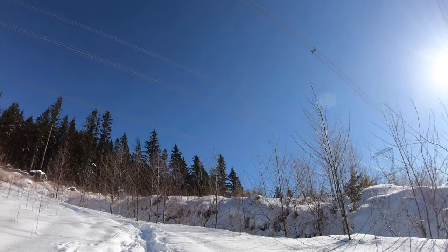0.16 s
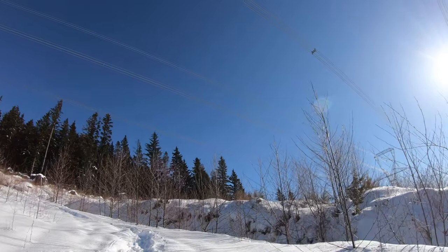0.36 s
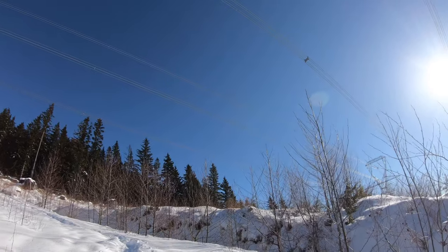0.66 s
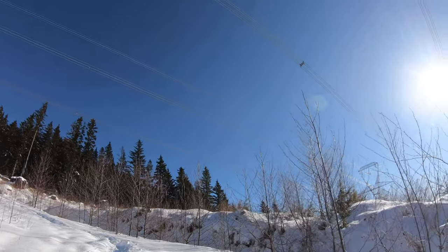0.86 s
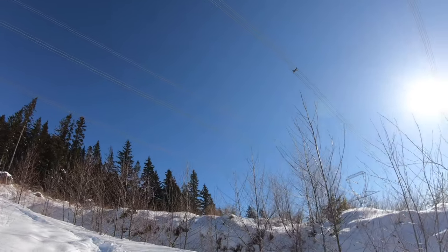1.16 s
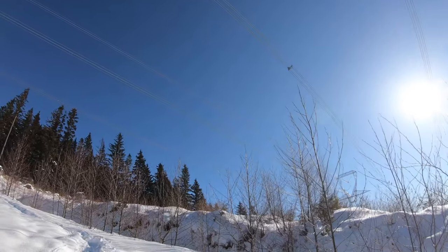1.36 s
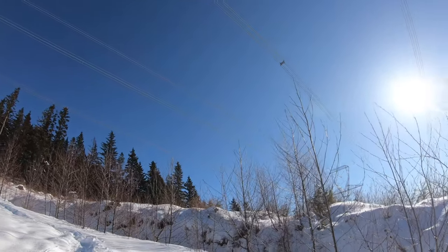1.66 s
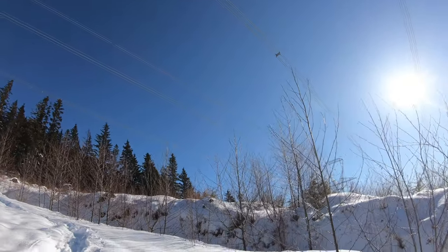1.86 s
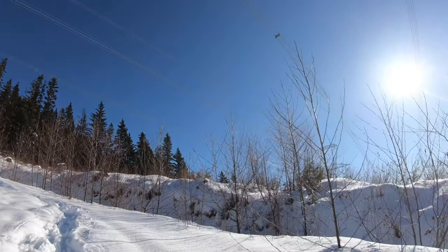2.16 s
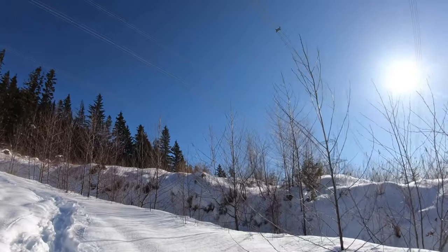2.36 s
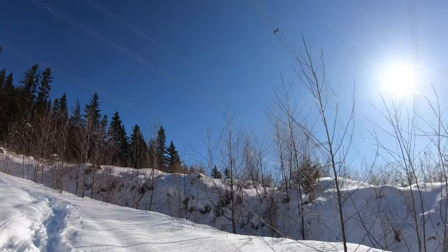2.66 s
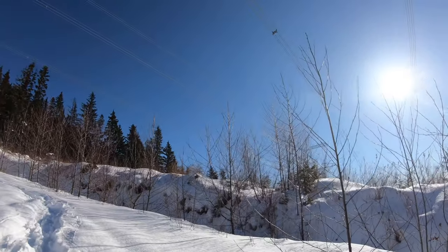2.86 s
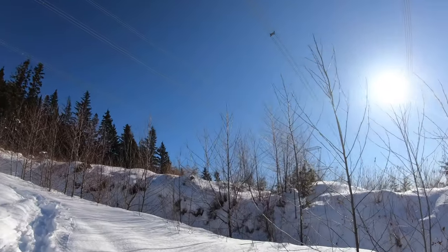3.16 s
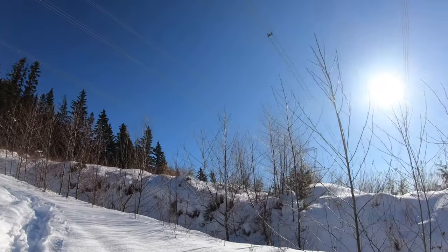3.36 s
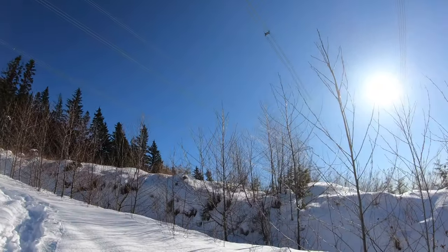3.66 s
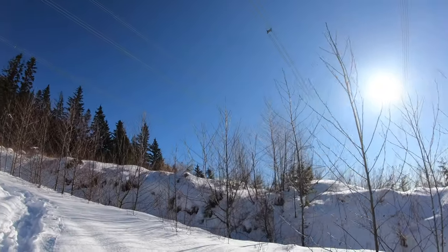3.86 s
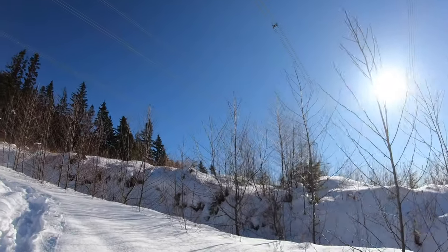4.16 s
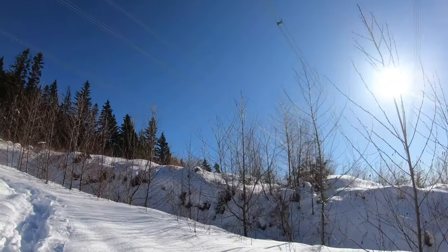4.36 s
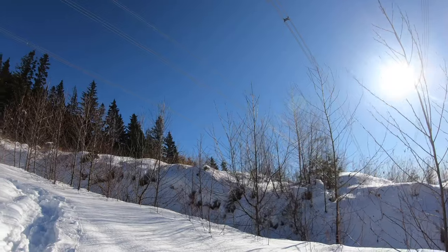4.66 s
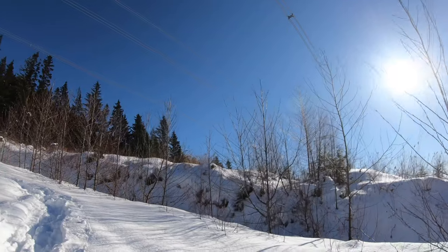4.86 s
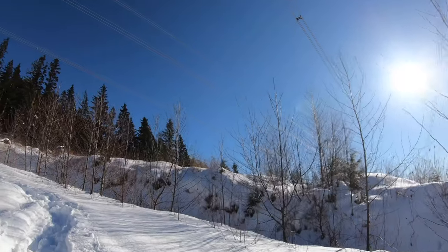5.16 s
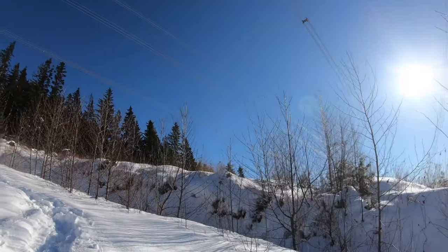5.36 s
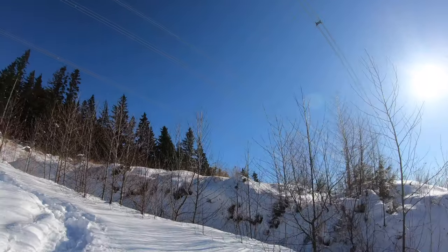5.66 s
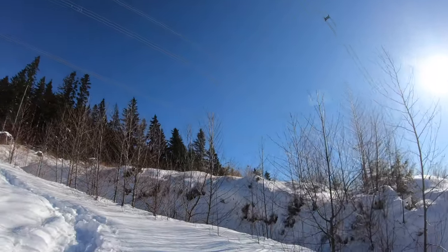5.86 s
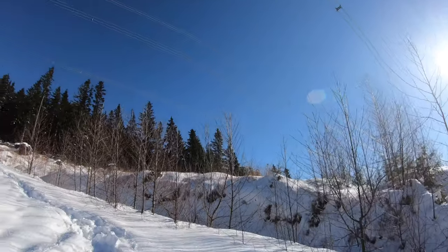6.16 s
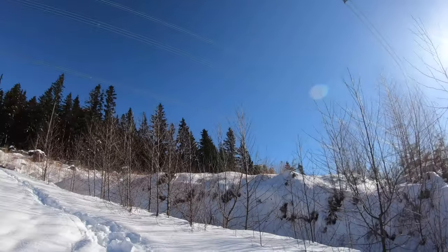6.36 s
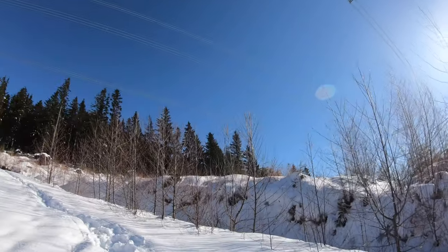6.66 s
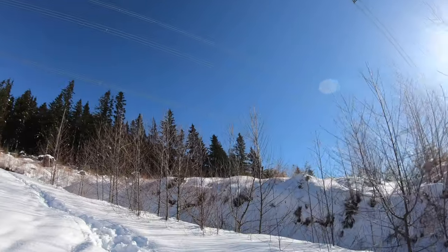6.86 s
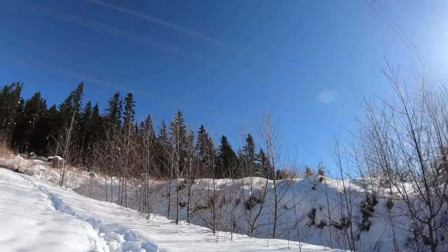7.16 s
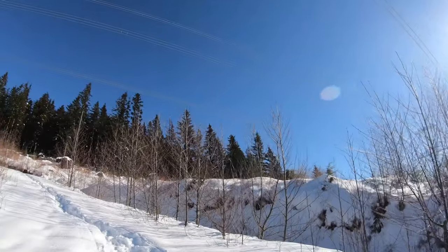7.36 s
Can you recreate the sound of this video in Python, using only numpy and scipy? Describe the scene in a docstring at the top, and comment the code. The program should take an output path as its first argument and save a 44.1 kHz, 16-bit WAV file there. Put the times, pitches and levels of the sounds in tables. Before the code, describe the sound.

Boots crunch at a walking pace through packed snow, with crust cracks, brief squeaks, faint cloth rustle and light wind buffeting the microphone.

```python
"""Footsteps on packed snow

Someone walks over packed snow on a quiet winter trail. Each boot sinks in one long crunch: a swarm of
breaking grains that follows its pressure, among short crunches, sharp cracks of crust and stick-slip squeaks.
Filtered noise and grains make the faint rustle of clothing; low noise and one-cycle puffs make the air
buffeting the microphone. The sound starts mono and opens to full stereo width between 2.8 and 5.8 s."""
import sys
import numpy as np
from scipy import signal
from scipy.fft import rfft, irfft
from scipy.io import wavfile
from scipy.ndimage import map_coordinates

SR = 44100
rng = np.random.default_rng(int(sys.argv[2]) if len(sys.argv) > 2 else 0)


def unload_wav(signal):
    """Save mono or channel-first audio to the path in sys.argv[1] as 16-bit WAV at rate SR, clipped to [-1, 1]."""
    wavfile.write(
        sys.argv[1],
        SR,
        np.round(np.clip(np.atleast_2d(signal).T, -1, 1) * 32767).astype(np.int16),
    )


N = 331796
TIME = np.arange(N) / SR

# relative spectrum of the breaking snow pack: (freq_hz, level_db)
SNOW_SPECTRUM = [(260, -0.5), (450, -0.5), (605, -3.5), (702, -0.5), (838, -4), (1090, -2.5), (1780, -4),
                 (2160, -2.5), (3580, -7.5), (4880, -17), (6970, -32.5), (8320, -24), (9510, -39),
                 (13600, -40.5), (15500, -56)]
# relative spectrum of hissing loose powder: (freq_hz, level_db)
POWDER_SPECTRUM = [(2240, 2.5), (3800, -29), (4030, 0.5), (7050, 3.5), (7930, 3.5), (13100, -17.5),
                   (14400, -24), (15500, -34)]
# the body's weight sinking into the snow, one curve for each long press of a boot: (time_s, pressure_db)
STEP_PRESSURES = [
    [(0.0, -22.5), (0.032, -23), (0.044, -18), (0.108, -24), (0.114, -32), (0.12, -22.5), (0.184, -21.5),
     (0.19, -30), (0.244, -25), (0.26, -33.5), (0.335, -34)],
    [(0.94, -52), (0.954, -25.5), (0.994, -19), (1.05, -23.5), (1.06, -19), (1.11, -26), (1.13, -41)],
    [(1.6, -73), (1.616, -21.5), (1.64, -26.5), (1.692, -25), (1.698, -29), (1.73, -26), (1.81, -31.5),
     (1.854, -26), (1.866, -36), (1.884, -26.5), (1.9, -41)],
    [(1.9, -36), (1.956, -21.5), (1.978, -24), (1.996, -28), (2.052, -24.5), (2.178, -31), (2.254, -39.5),
     (2.27, -38)],
    [(2.85, -39), (2.87, -21.5), (2.926, -19.5), (2.956, -22), (2.966, -19), (3.016, -21.5), (3.03, -34),
     (3.088, -20), (3.098, -28), (3.116, -24.5), (3.135, -42)],
    [(3.68, -52), (3.696, -47), (3.87, -27), (3.906, -37), (3.922, -28), (4.028, -35.5), (4.052, -26),
     (4.152, -31.5), (4.176, -44.5), (4.204, -37), (4.25, -44)],
    [(4.84, -63), (4.848, -27), (4.898, -23.5), (4.928, -26.5), (4.946, -23), (4.97, -38), (4.978, -30.5),
     (4.994, -28), (5.044, -24.5), (5.108, -31.5), (5.13, -50)],
    [(5.56, -60), (5.578, -36), (5.618, -34), (5.762, -35), (5.778, -25), (5.98, -30.5), (6.056, -30.5),
     (6.228, -37), (6.252, -51), (6.266, -36), (6.3, -64)],
    [(6.73, -41), (6.738, -37.5), (6.774, -27), (6.806, -26), (6.842, -39), (6.952, -25.5), (6.984, -29.5),
     (7.028, -28), (7.148, -38), (7.244, -41), (7.28, -63)],
]
# loose powder along the trail, its hiss against the crunch of a footfall: (time_s, level_db)
LOOSE_POWDER = [(0, -26.5), (.3, -17.5), (1.0, -23), (1.8, -16), (2.2, -17.5), (2.95, -24.5), (3.75, -14),
                (4.1, -12.5), (4.25, -6), (5.0, -14.5), (5.8, -6), (6.25, -13), (6.7, -4.5), (7.25, -6)]


def crunches(creak_db=5, creak_octaves=0.71, thud_octaves=0.73, boom_db=-4, boom_hz=155, boom_octaves=0.3,
             bite=0.13, usual_db=-28, powder_growth=.93):
    """Granular fracture: each collapse is a swarm of grains coloured by snow pack, pressing sole and powder."""
    hz, out = np.fft.rfftfreq(2048, 1 / SR), np.zeros((2, N))
    swarm = grains(per_s=5500, spread_db=2.8, clump_db=2.4, clumps_per_s=380)
    coarse = patchy(swarm + .7 * scatter(slips()), depth_db=2.8, patch_ms=16, patch_hz=260)
    powder_grains = grains(per_s=15000, spread_db=3.5, clump_db=1.87, clumps_per_s=180)
    fine = patchy(powder_grains, depth_db=2.5, patch_ms=25, patch_hz=400)
    powder = impulse_response(gain_of(read(POWDER_SPECTRUM, hz)))
    for start, load, hiss_db, heel_hz, toe_hz, heel_db, toe_db, thud_hz in presses():
        span = round(start * SR) + np.arange(len(load))
        roll = np.linspace(0, 1, len(load))  # from heel to toe
        mean_load = load.mean()
        bite_db = bite * (20 * np.log10(mean_load) - usual_db)  # harder pressure snaps brighter
        bite_band = bite_db * bump(hz, centre_hz=5030, octaves=0.14)
        boom = gain_of(boom_db) * bump(hz, boom_hz, boom_octaves)
        sole = evened(bump(hz, thud_hz, thud_octaves) + boom)
        grain_load = evened(coarse[:, span]) * load
        for share, creak_hz, thud_db in (1 - roll, heel_hz, heel_db), (roll, toe_hz, toe_db):
            creak = creak_db * bump(hz, creak_hz, creak_octaves)
            pack = evened(gain_of(read(SNOW_SPECTRUM, hz) + creak + bite_band))
            colour = np.hypot(pack, gain_of(thud_db) * sole) * radiated(hz)
            body = impulse_response(colour) * np.sqrt(np.mean(colour ** 2))
            add(out, start, signal.fftconvolve(grain_load * share, body[None]))
        # powder shifts even under a light load
        hiss = gain_of(hiss_db) * mean_load * (load / mean_load) ** powder_growth
        add(out, start, signal.fftconvolve(evened(fine[:, span]) * hiss, powder[None]))
    return out


def presses(stutter_db=0.5, stutters_per_s=55, rise_share=0.14, fall_s=0.0095, step_db=1):
    """Loading of the snow: footfalls sink by fits; short crunches snap, sag and let go.

    Yields (start_s, load, powder_db, heel_hz, toe_hz, heel_thud_db, toe_thud_db, thud_hz)."""
    # the snow under each long press, thuds relative to the pack:
    # (heel_creak_hz, toe_creak_hz, heel_thud_db, toe_thud_db, thud_hz)
    footings = [(1150, 1470, -5, -4, 220), (1410, 2000, -10, -7.5, 420), (2430, 2250, -6, -2, 274),
                (2150, 1624, -7, 0, 336), (1100, 1700, -10.5, -0.5, 310), (750, 1400, -29, -1, 275),
                (1830, 900, -14, 0.5, 215), (1500, 980, -5, -9.5, 178), (1500, 1600, -9.5, -3, 193)]
    # short separate crunches as a boot pushes off or settles, thud and hiss relative to the crunch:
    # (start_s, length_s, first_level_db, sag_db, creak_hz, thud_db, powder_db)
    short_crunches = [(0.338, 0.032, -29.5, -3.5, 1950, -25, -20), (0.425, 0.029, -33, 2.5, 1720, -7, -14),
                      (0.502, 0.017, -35.5, -4, 1390, -17, -17), (0.591, 0.036, -27, 6.5, 1670, -19, -10),
                      (0.662, 0.014, -35.5, 3, 2080, 2.5, -33), (0.715, 0.033, -30.5, 6, 1080, 3.5, -26),
                      (.811, 0.011, -32, 7, 1300, -11, -34), (0.86, 0.029, -29.5, -9.5, 1210, -6.5, -23),
                      (0.902, 0.024, -38.5, -7, 750, -3, -31), (1.137, .112, -22.5, -1.5, 2090, -3, -19),
                      (2.271, 0.11, -24.5, 8.5, 1100, -3, -17), (2.392, 0.049, -38, 1, 2040, -18, -16),
                      (2.648, .029, -24.5, 0, 3020, -26, -20), (2.673, 0.063, -36.5, -9.5, 2140, -4, -16),
                      (2.724, 0.047, -25, -0.5, 1160, -9, -17), (2.802, 0.027, -28.5, 4.5, 1270, -3, -25),
                      (2.838, 0.012, -24, 8.5, 750, 4.5, -15), (3.145, 0.063, -22.5, 1.5, 1450, -2.5, -27),
                      (3.51, 0.055, -44.5, 3, 2080, -18, -9.5), (3.566, 0.045, -29.5, -1, 1390, 1.5, -20),
                      (4.254, 0.045, -31.5, 1, 745, -5, -8), (4.306, 0.062, -39.5, 4.5, 1630, -11, -7),
                      (4.393, 0.055, -43.5, 1.5, 2260, -12, -1), (4.523, 0.068, -38.5, 8, 1330, -22, -22),
                      (4.611, 0.044, -22, 16.5, 696, -22, -10), (4.693, 0.03, -33.5, 7.5, 1940, -9, -9.5),
                      (4.728, 0.012, -34, 3, 750, -3, -3.5), (4.777, .039, -42.5, -1.5, 1150, 0, -2),
                      (5.15, 0.051, -26.5, -2, 1100, -4.5, -14), (5.515, 0.014, -33.5, 16, 750, 8, -3),
                      (6.502, 0.052, -37, 5.5, 744, -22, -5), (6.565, 0.043, -32, 5, 1500, -16, -6.5),
                      (6.625, 0.092, -33.5, 13.5, 1320, -20, -1.5)]
    stutter, loose = stutter_db * wobble(stutters_per_s), follow(LOOSE_POWDER)
    for curve, footing in zip(STEP_PRESSURES, footings):
        span = slice(max(round(curve[0][0] * SR), 0), round(curve[-1][0] * SR))
        pressure_db = np.interp(TIME[span], *np.transpose(curve))
        load = gain_of(pressure_db + stutter[span] + step_db)
        yield TIME[span][0], load, loose[span], *footing
    for start, length, first_db, sag_db, creak_hz, thud_db, hiss_db in short_crunches:
        t = np.arange(0, length + .04, 1 / SR)
        rise = np.minimum(t / (rise_share * length), 1)
        release = np.exp(-np.maximum(t - length + fall_s / 2, 0) / fall_s)
        load = rise * release * gain_of(first_db - sag_db * np.minimum(t / length, 1))
        yield start, load, hiss_db, creak_hz, creak_hz, thud_db, thud_db, 340  # sole thud, Hz


def grains(per_s, spread_db, clump_db, clumps_per_s):
    """Random impulses: ice bonds snap in small avalanches; a few are much larger than the rest."""
    size = gain_of(spread_db * np.minimum(rng.exponential(1, (2, N)), 4))
    sign = rng.choice([-1., 1.], (2, N))
    snaps = size * sign * (rng.random((2, N)) < per_s / SR)
    return evened(snaps * gain_of(clump_db * np.clip(wobble(clumps_per_s), -2, 2)))


def slips(slip_hz=230, glide=.35, glides_per_s=22, jitter=.07, uneven_db=0.5):
    """Stick-slip friction: runs of nearly regular snaps whose rate glides."""
    rate = slip_hz * np.exp(glide * wobble(glides_per_s) + jitter * wobble(per_s=500))
    snaps = np.diff(np.floor(np.cumsum(rate) / SR), prepend=0)  # one per whole cycle
    return evened(snaps * gain_of(uneven_db * rng.standard_normal((2, N))))


def scatter(x, count=400, spread_s=.0018):
    """Multiple scattering: a snap bounces among grains for a few milliseconds, its colour unchanged."""
    decay = np.exp(-np.arange(count) / (spread_s * SR))
    paths = rfft(rng.standard_normal((2, count)) * decay, 2048)
    all_pass = irfft(paths / np.abs(paths))  # phase only
    smear = np.roll(all_pass, 200, axis=1)
    return signal.oaconvolve(x, smear, axes=1)[:, :N]


def patchy(x, depth_db, patch_ms, patch_hz):
    """Local resonance: each clod rings briefly at pitches of its own, as random time-frequency patches."""
    z = signal.stft(x, nperseg=512, noverlap=384)[2]
    bins, frames = np.indices(z.shape[1:])
    hz, ms = bins * SR / 512, frames * 128000 / SR  # 128 samples a frame
    knots = rng.standard_normal((256, 1024))
    field = map_coordinates(knots, [hz / patch_hz, ms / patch_ms], order=1, mode="wrap")
    z = z * gain_of(depth_db * np.clip(evened(field), -2, 2))
    return evened(signal.istft(z, nperseg=512, noverlap=384)[1][:, :N])


def radiated(hz, corner_hz=115):
    """Radiation efficiency: a boot is too small to radiate deep bass."""
    return 1 / np.sqrt(1 + (corner_hz / (hz + 1)) ** 8)


def cracks(ring_db=13, ring_octaves=0.52, crumble_s=0.004, strain_s=0.0025, treble_db=14, sole_hz=320,
           level_db=-1.5):
    """Brittle fracture: crust ticks under strain, snaps once and crumbles; loose powder makes it brighter."""
    # single loud breaks of the crust, peak before level_db, thud relative: (time_s, peak_db, ring_hz, thud_db)
    large_cracks = [(.224, -9.5, 1230, 2), (.241, -7, 1380, 12), (.362, -13, 2070, -24),
                    (.399, -15, 1662, -20), (.522, -19.5, 1440, -23), (.596, -19, 3870, -10),
                    (.707, -8.5, 1100, 8), (.738, -13.5, 1010, -11), (.816, -10.5, 1340, -32),
                    (.872, -17, 1183, 3), (.885, -9.5, 1240, -19), (1.364, -25, 1500, -17),
                    (1.398, -21, 883, -7), (1.451, -23.5, 1000, 6), (1.557, -31, 2270, -16),
                    (1.588, -19, 1440, -13), (1.615, -10.5, 1831, -31), (1.673, -8.5, 2070, 24),
                    (1.688, -7, 2340, -16), (1.733, -9, 1230, 10), (1.853, -20, 1500, -12),
                    (2.173, -16, 920, 30), (2.322, -14.5, 930, 24), (2.655, -10, 3132, -18),
                    (2.699, -20, 2185, -16), (2.842, -13, 1100, 3), (3.168, -5.5, 1470, 17),
                    (3.312, -30, 2070, -14), (3.394, -25.5, 1620, -16), (3.528, -19, 2090, -6),
                    (3.573, -11, 622, -16), (4.054, -13.5, 844, -14), (4.551, -20, 1340, -26),
                    (4.608, -19.5, 623, -17), (4.975, -9.5, 991, 13), (5.515, -18, 650, -9),
                    (6.09, -18, 1230, 7), (6.127, -13, 969, 19), (6.178, -16.5, 1400, 0),
                    (6.637, -22, 4250, -28), (6.728, -17, 700, 13), (6.775, -11, 1200, -3)]
    hz, t, out = np.fft.rfftfreq(1024, 1 / SR), np.arange(-600, 1500) / SR, np.zeros((2, N))
    treble = np.clip((hz - 3000) / 2500, 0, 1)
    crumb_envelope = np.exp(np.minimum(t / strain_s, -t / crumble_s))
    for s, peak_db, ring_hz, thud_db in [*large_cracks, *small_cracks()]:
        crumbs = rng.standard_normal((2, len(t))) * crumb_envelope
        snap = (t == 0) + .085 * crumbs
        bright_db = treble_db + np.interp(s, *np.transpose(LOOSE_POWDER))
        resonance = ring_db * bump(hz, ring_hz, ring_octaves)
        colour = gain_of(read(SNOW_SPECTRUM, hz) + resonance + bright_db * treble)
        colour += gain_of(thud_db) * bump(hz, sole_hz, octaves=0.74)  # the sole drops onto the layer below
        sound = signal.fftconvolve(snap, impulse_response(colour * radiated(hz))[None])
        peak = np.abs(sound).max(axis=1, keepdims=True)
        add(out, s + t[0], gain_of(peak_db + level_db) * sound / peak)
    return out


def small_cracks(count=2, over_db=7, low_hz=700, high_hz=2400, thud_db=-10):
    """Fracture under load: crust breaks at random in each footfall, as hard as the boot presses.

    Yields (time_s, peak_db, ring_hz, thud_db)."""
    for curve in STEP_PRESSURES:
        s, pressure_db = np.transpose(curve)
        for when, pitch in rng.random((count, 2)):
            at = s[0] + when * (s[-1] - s[0])
            ring_hz = low_hz * (high_hz / low_hz) ** pitch
            yield at, np.interp(at, s, pressure_db) + over_db, ring_hz, thud_db


def squeaks(jitter=0.019, overtone_db=-11, slope_db=-2):
    """Stick-slip harmonics: gliding groans with a strong fundamental and weak, unsteady overtones."""
    # the sole sticks and slips on the cold snow: (start_s, end_s, first_pitch_hz, last_pitch_hz, level_db)
    groans = [(.895, 0.94, 690, 620, -35.5), (.978, 0.994, 470, 527, -28), (1.08, 1.123, 439, 395, -24),
              (1.108, 1.135, 480, 500, -28), (1.172, 1.19, 400, 520, -19.5),
              (1.215, 1.284, 443, 513, -37.5), (1.659, 1.768, 391, 337, -33),
              (2.856, 2.905, 1127, 1147, -27), (2.872, 2.925, 491, 533, -30),
              (3.004, 3.015, 430, 463, -19.5), (3.072, 3.107, 352, 400, -26),
              (4.603, 4.615, 626, 637, -28.5)]
    out, waver = np.zeros((2, N)), 1 + jitter * wobble(per_s=400)
    for start, end, first_hz, last_hz, level_db in groans:
        hz = np.linspace(first_hz, last_hz, max(round((end - start) * SR), 64))
        phase = 2 * np.pi * np.cumsum(hz * waver[round(start * SR):][:len(hz)]) / SR
        tone = np.sin(phase)
        for k in range(2, 7):
            overtone = np.sin(k * phase + 2 * np.pi * rng.random())
            tone += gain_of(overtone_db + slope_db * (k + 0.5)) * overtone
        add(out, start, gain_of(level_db) * evened(tone * np.hanning(len(hz)) ** .5)[None])
    return out


def rustle(swing_db=3, swing_lag_s=0.032, swing_spread_s=0.18, level_db=-3, flutter_db=0.9):
    """Friction noise: cloth and trickling crumbs swell as the leg swings after each footfall, over a hiss."""
    # relative spectrum of clothing: (freq_hz, level_db)
    cloth_spectrum = [(88, -33), (150, -5), (302, -5.5), (381, -9), (519, -6.5), (708, -11), (781, -8.5),
                      (877, -15), (1270, -11), (1450, -10.5), (2060, -12), (3100, -13.5), (4390, -22),
                      (12800, -46.5), (15500, -47)]
    # clothing before level_db, swing and flutter: (time_s, level_db)
    cloth_levels = [(0, -51), (1.3, -42), (1.53, -53), (2.5, -46), (3.3, -48), (6.3, -54), (7.52, -52.5)]
    # faint high hiss: (time_s, level_db)
    hiss_levels = [(0, -72), (2.6, -84), (3.7, -59.5), (7.52, -62.5)]
    crumbs = grains(per_s=2500, spread_db=6.5, clump_db=4.5, clumps_per_s=81)
    colour = impulse_response(gain_of(read(cloth_spectrum, np.fft.rfftfreq(2048, 1 / SR))))
    trickle = signal.oaconvolve(crumbs, colour[None])[:, :N]
    cloth = evened(noise(cloth_spectrum) + 1.03 * trickle)
    swing = np.zeros(N)
    for curve in STEP_PRESSURES:
        since_swing = TIME - curve[-1][0] - swing_lag_s
        swing += np.exp(-.5 * (since_swing / swing_spread_s) ** 2)
    cloth_db = follow(cloth_levels) + level_db + swing_db * swing + flutter_db * wobble(per_s=28)
    hiss = noise(POWDER_SPECTRUM) * gain_of(follow(hiss_levels))
    return cloth * gain_of(cloth_db) + hiss


def wind(level_db=-1.0, lumps_db=1.0, apart=0.73):
    """Turbulent pressure: lumpy rumble, partly different at each port, with a few one-cycle puffs."""
    # relative spectrum of the breeze: (freq_hz, level_db)
    breeze_spectrum = [(11, -13), (18, -7), (59, 3.5), (172, -8), (212, -26), (321, -23), (370, -17),
                       (400, -50), (520, -56), (880, -120)]
    # strength of the breeze before level_db and lumps: (time_s, level_db)
    breeze_levels = [(0.0, -56), (0.5, -36), (0.69, -53), (1.23, -44.5), (1.28, -54), (2.32, -38.5),
                     (2.55, -63), (2.68, -36), (4.02, -45), (4.06, -38), (4.4, -55.5), (5.25, -33.5),
                     (5.38, -52), (5.72, -27), (5.78, -51), (5.84, -40), (5.86, -39), (6.2, -35),
                     (6.43, -48.5), (7.06, -26.5), (7.48, -81), (7.52, -64)]
    # puffs of air on the microphone, nominal size: (middle_s, amplitude_db, pitch_hz)
    puffs = [(0.483, -20, 155), (2.761, -23, 130), (3.1, -17, 136), (3.19, -19, 145), (4.062, -19, 132),
             (5.229, -20, 91), (5.712, -14, 95), (5.837, -16.5, 90), (6.092, -18, 93.5), (6.954, -21, 130),
             (6.976, -14.5, 85.5), (7.035, -9, 88)]
    breeze_db = follow(breeze_levels) + level_db + lumps_db * wobble(per_s=20)
    shared, differing = noise(breeze_spectrum) * gain_of(breeze_db)
    out = np.array([shared + apart * differing, shared - apart * differing])
    t = np.arange(-1500, 1500) / SR
    for s, amplitude_db, hz in puffs:
        puff = gain_of(amplitude_db) * np.sin(2 * np.pi * hz * t) * np.exp(-np.abs(hz * t) / 0.44)
        add(out, s + t[0], puff * gain_of([[1], [-1]]))  # left 1 dB up, right 1 dB down
    return out


def ports(sound):
    """Diffraction: the left microphone port lies in shadow, so boots come later, duller, partly scattered."""
    # left port against the right one: (freq_hz, level_db)
    left_shade = [(100, 0.1), (350, -1), (700, -8), (1200, -17), (2400, -14), (4400, -5.5), (8000, -7.5),
                  (15000, -2.5)]
    # likeness of the two ports: (freq_hz, likeness from 0 to 1)
    port_likeness = [(100, 0.95), (350, 1), (1000, 1), (3000, 0.15), (7000, 0.84), (15000, 0.073)]
    # phase lag of the left port: (freq_hz, lag_rad)
    left_lag = [(100, .05), (500, .8), (1500, 2.4), (3000, 2.0), (5000, 3.2), (8000, 4.4), (11400, 6.5),
                (15000, 9.3)]
    hz = np.fft.rfftfreq(N, 1 / SR)
    direct, scattered = rfft(sound)
    shade, same = gain_of(read(left_shade, hz)), np.clip(read(port_likeness, hz), 0, 1)
    through = shade * same * np.exp(-1j * read(left_lag, hz))
    stray = shade * np.sqrt(1 - same ** 2)
    centre = np.hypot(np.abs(1 + through), stray) / 2  # the sum of both ports keeps the snow's colour
    return irfft(np.array([through * direct + stray * scattered, direct]) / centre, N)


def gain_of(db):
    """Decibel law: amplitude factor of a level."""
    return 10 ** (np.asarray(db) / 20)


def evened(x):
    """Power normalisation: scales to rms 1."""
    return x / np.sqrt(np.mean(np.abs(x) ** 2) + 1e-20)


def read(points, hz):
    """Log-frequency interpolation of a spectrum table."""
    f, value = np.transpose(points)
    return np.interp(np.log(hz + 1), np.log(f + 1), value)


def follow(curve):
    """Linear interpolation of a time curve at every sample."""
    return np.interp(TIME, *np.transpose(curve))


def add(mix, s, sound):
    """Superposition: lays a sound into the two-row mix at time s."""
    part = mix[:, max(round(s * SR), 0):][:, :sound.shape[1]]
    part += sound[:, :part.shape[1]]


def bump(hz, centre_hz, octaves):
    """Gaussian resonance on the log-frequency axis."""
    return np.exp(-.5 * (np.log2((hz + 1) / centre_hz) / octaves) ** 2)


def impulse_response(gain):
    """Minimum phase: the causal impulse response, of energy 1, with this shape of magnitude."""
    log_gain = np.log(np.maximum(gain / gain.max(), 1e-5))
    circle = np.concatenate([log_gain, log_gain[-2:0:-1]])
    response = np.fft.ifft(np.exp(np.conj(signal.hilbert(circle)))).real
    return response / np.linalg.norm(response)


def noise(spectrum):
    """Spectral shaping: two unrelated noises of one colour."""
    white = rfft(rng.standard_normal((2, N)))
    gain = gain_of(read(spectrum, np.fft.rfftfreq(N, 1 / SR)))
    return evened(irfft(white * gain, N))


def wobble(per_s):
    """Random modulation: linear glides between chance values, rms about 1."""
    knots = rng.standard_normal(N)
    return np.interp(TIME * per_s, np.arange(N), knots) * np.sqrt(3 / 2)


def scene(near_db=-9):
    """Superposition: boots reach the ports from below; clothing is also heard close by, in the middle."""
    cloth = rustle()
    from_below = ports(crunches() + cracks() + squeaks() + cloth)
    return from_below + gain_of(near_db) * cloth[1] + wind()


def record(dry, band_hz=4050, band_octaves=0.21, mono_cut_db=-2, width_cut_db=-3, edge_hz=15600):
    """Mid-side stereo: mono opens to full width as a narrow cut deepens; soft limiting, then the band limit."""
    # stereo width: (time_s, width from 0 to 1)
    width_curve = [(2.8, 0), (3.1, 0.17), (3.5, 0.48), (4.2, 0.71), (5.0, 0.82), (5.8, 1)]
    width = np.clip(follow(width_curve), 0, 1)
    mid, side = (dry[0] + dry[1]) / 2, (dry[0] - dry[1]) / 2 * width
    pair = np.array([mid + side, mid - side])
    band = irfft(rfft(pair) * bump(np.fft.rfftfreq(N, 1 / SR), band_hz, band_octaves), N)
    heard = pair + band * (gain_of(mono_cut_db + width * width_cut_db) - 1)
    rounded = heard / (1 + (heard / .56) ** 6) ** (1 / 6)
    low_pass = signal.firwin(511, edge_hz, window=("kaiser", 9), fs=SR)
    return signal.oaconvolve(rounded, low_pass[None], "same")


dry = scene()
out = record(dry)
unload_wav(out)
```